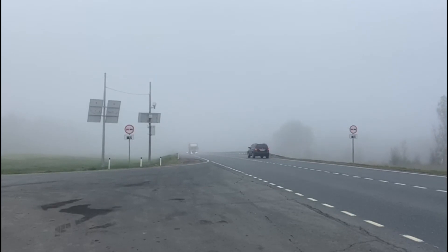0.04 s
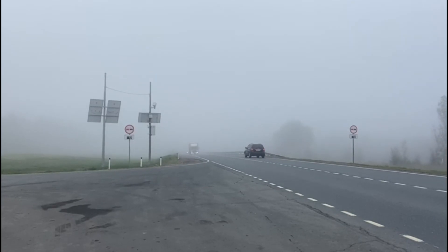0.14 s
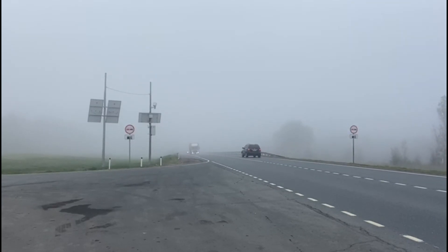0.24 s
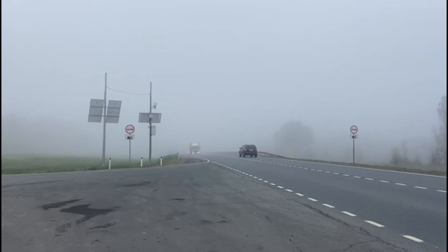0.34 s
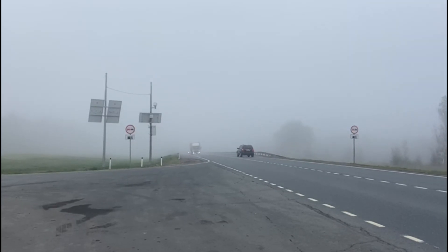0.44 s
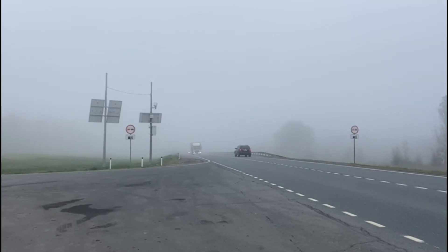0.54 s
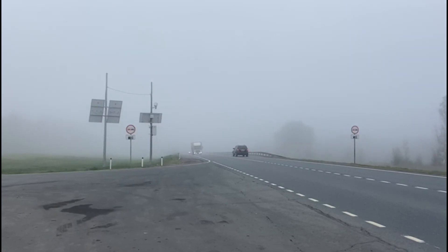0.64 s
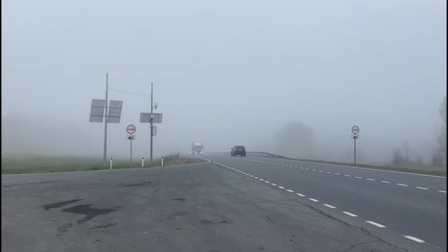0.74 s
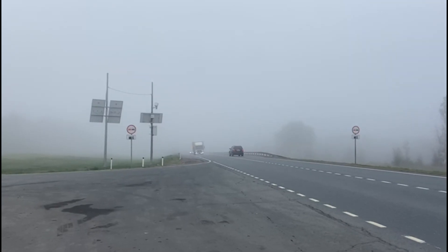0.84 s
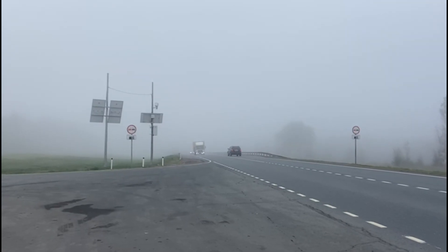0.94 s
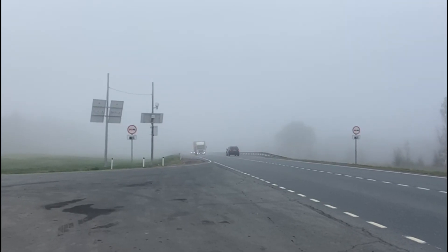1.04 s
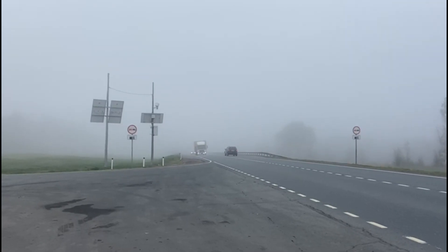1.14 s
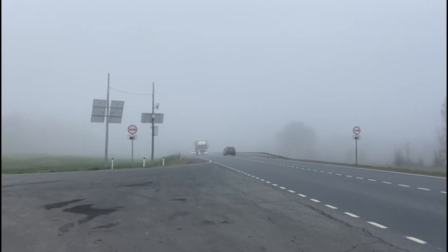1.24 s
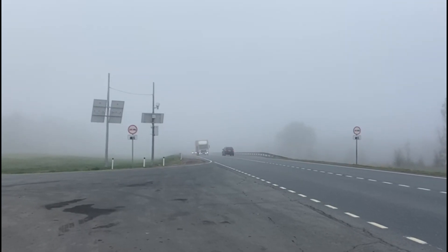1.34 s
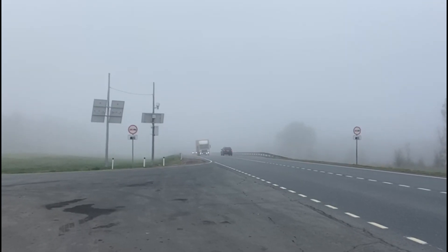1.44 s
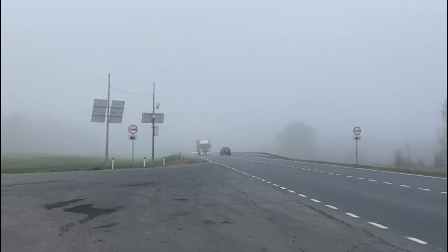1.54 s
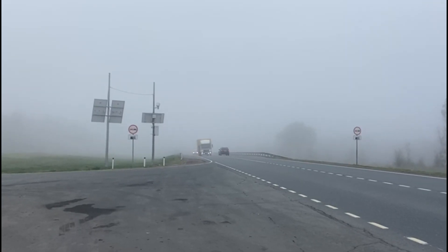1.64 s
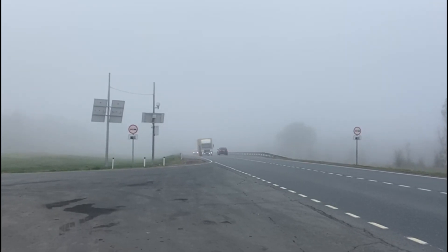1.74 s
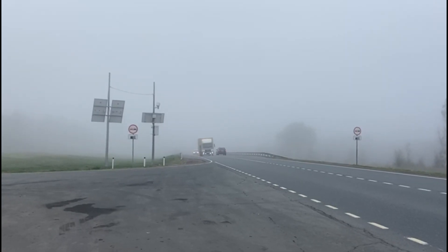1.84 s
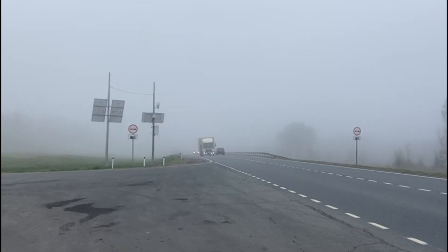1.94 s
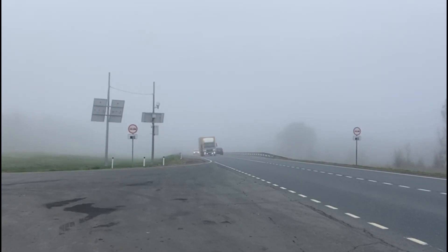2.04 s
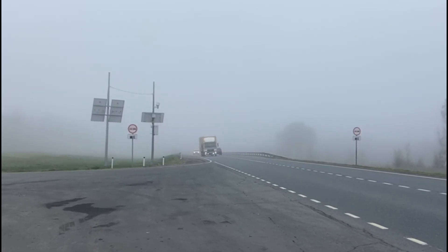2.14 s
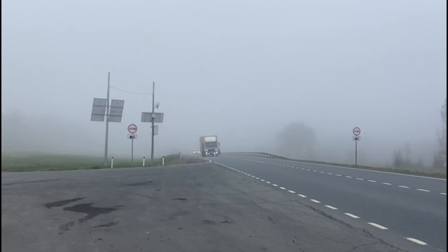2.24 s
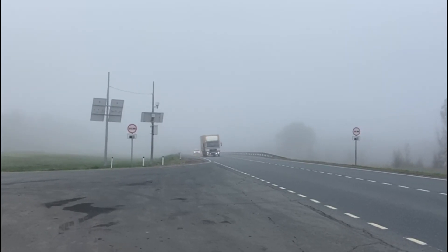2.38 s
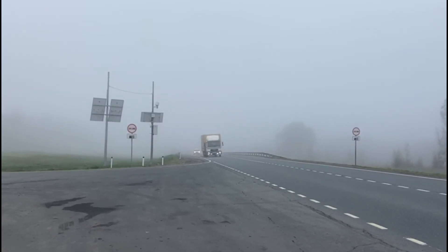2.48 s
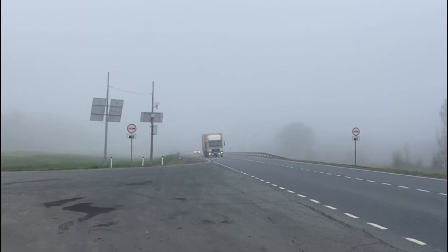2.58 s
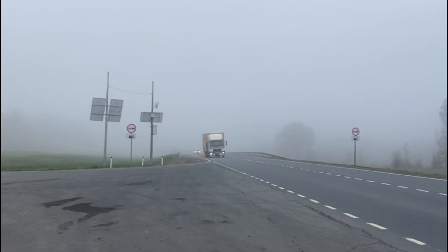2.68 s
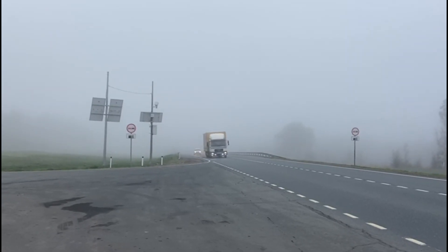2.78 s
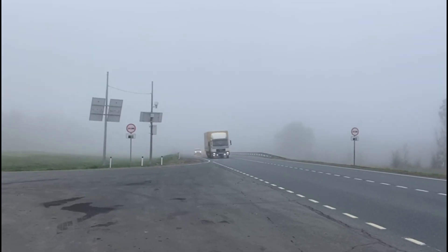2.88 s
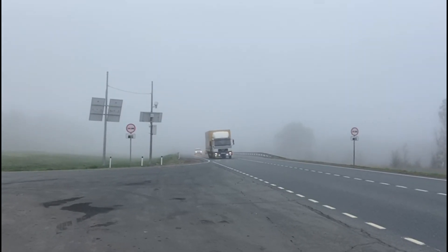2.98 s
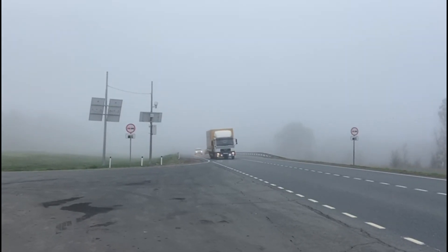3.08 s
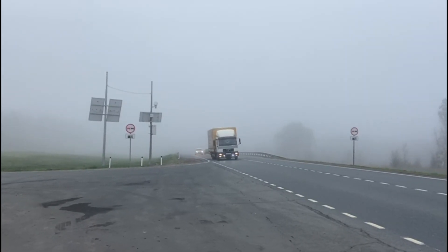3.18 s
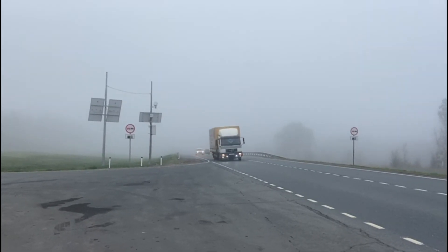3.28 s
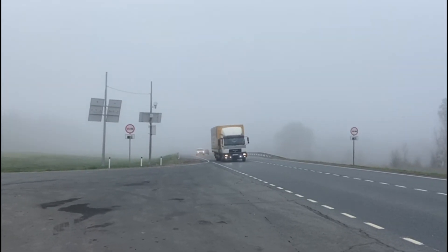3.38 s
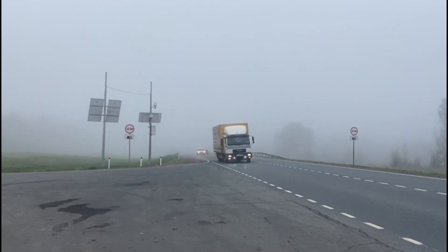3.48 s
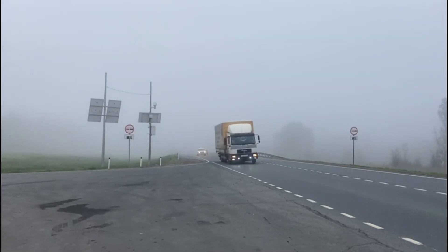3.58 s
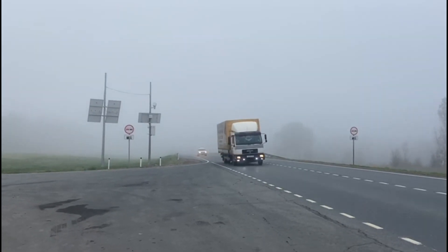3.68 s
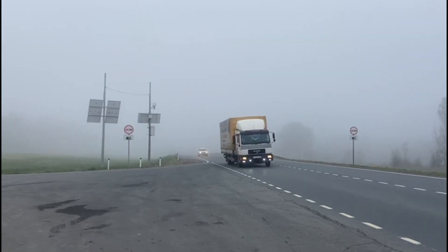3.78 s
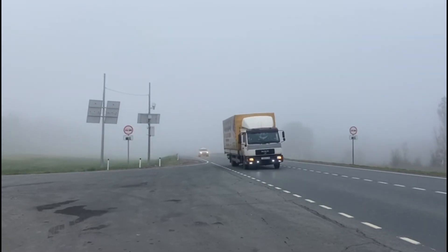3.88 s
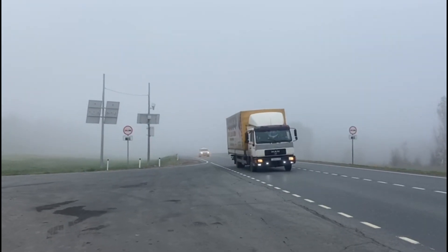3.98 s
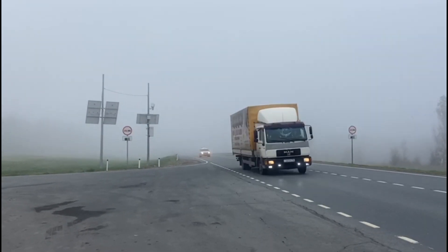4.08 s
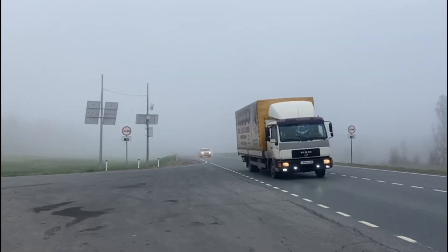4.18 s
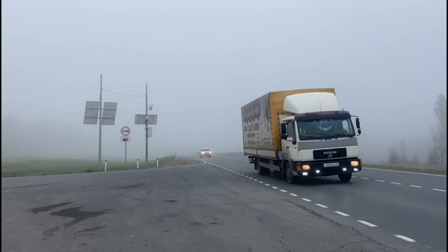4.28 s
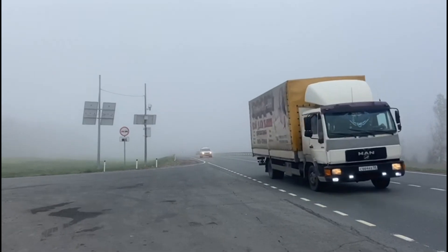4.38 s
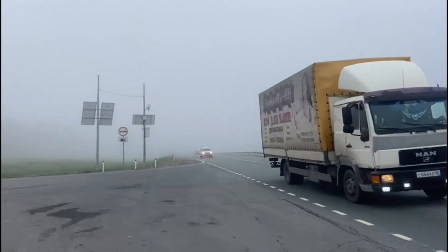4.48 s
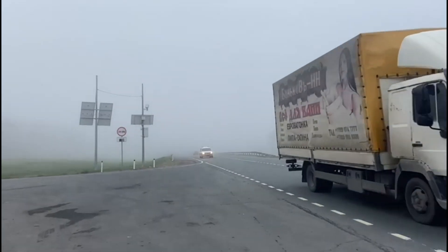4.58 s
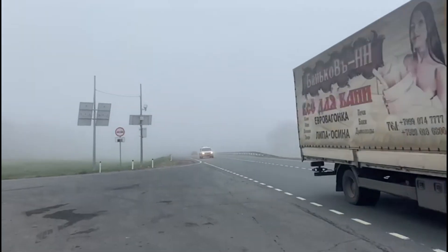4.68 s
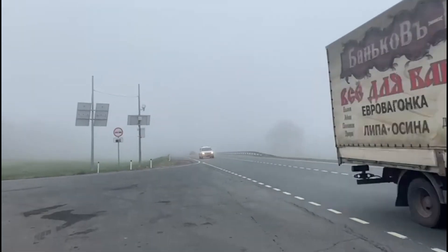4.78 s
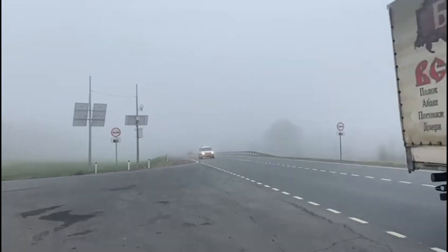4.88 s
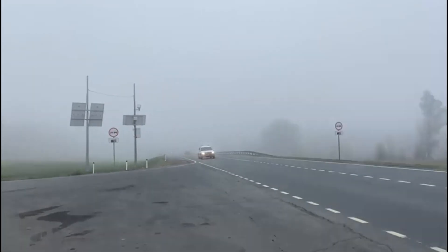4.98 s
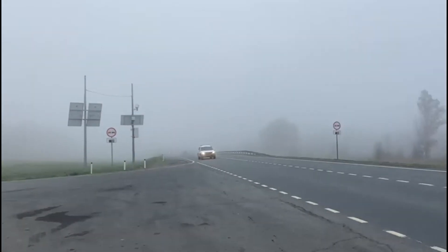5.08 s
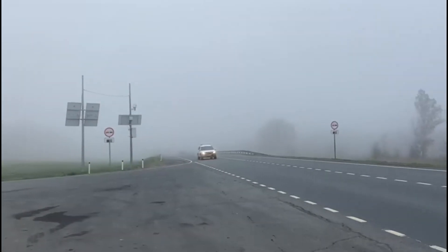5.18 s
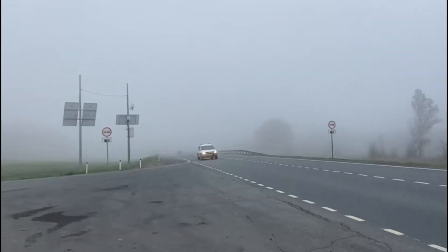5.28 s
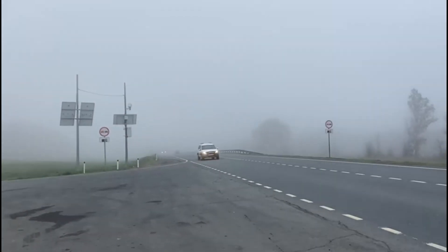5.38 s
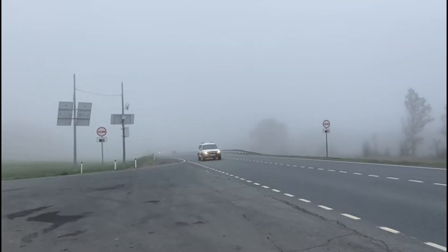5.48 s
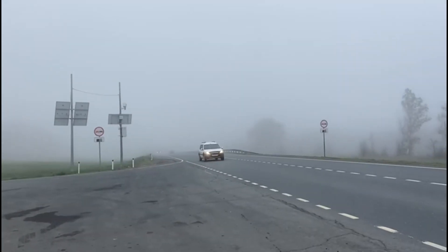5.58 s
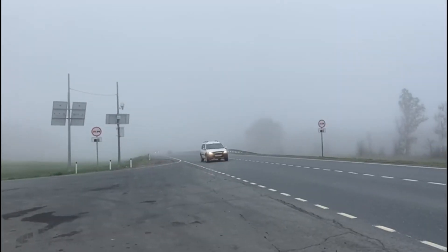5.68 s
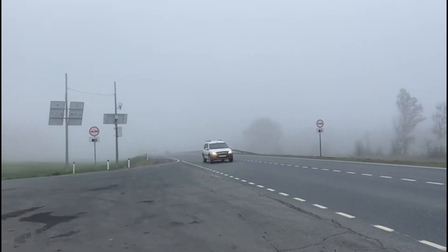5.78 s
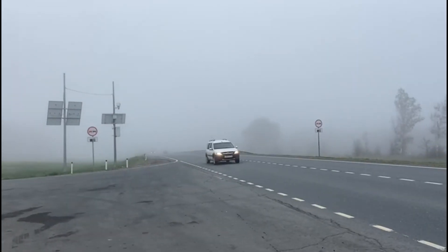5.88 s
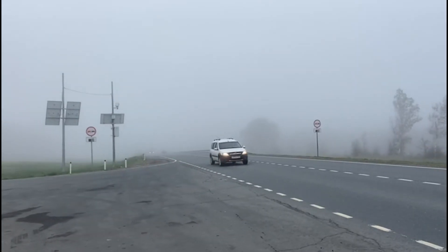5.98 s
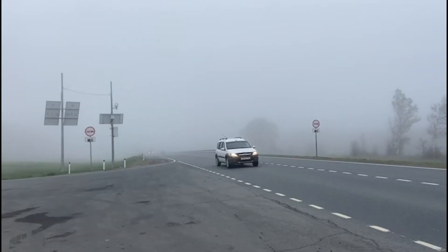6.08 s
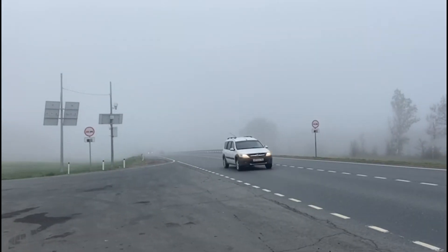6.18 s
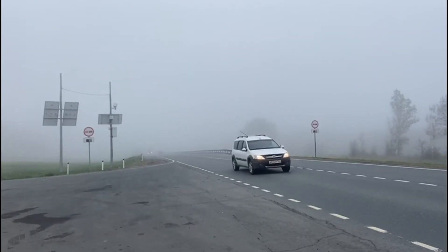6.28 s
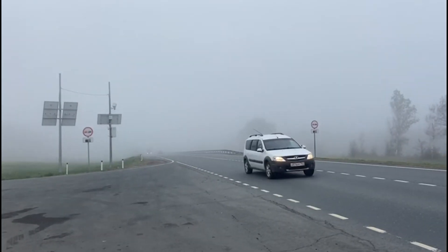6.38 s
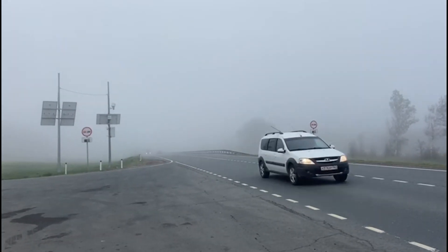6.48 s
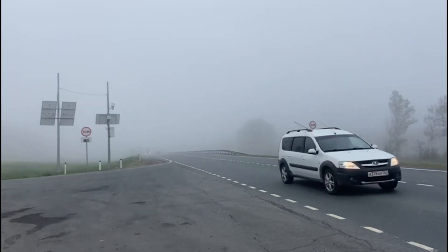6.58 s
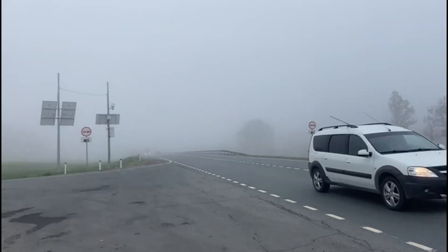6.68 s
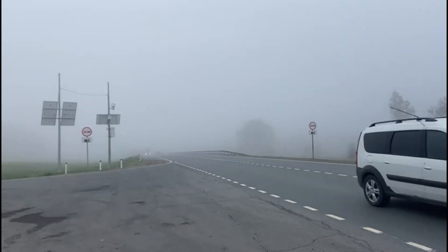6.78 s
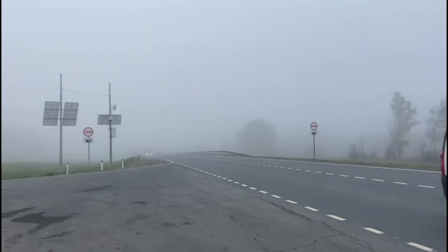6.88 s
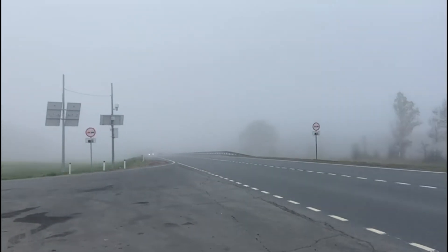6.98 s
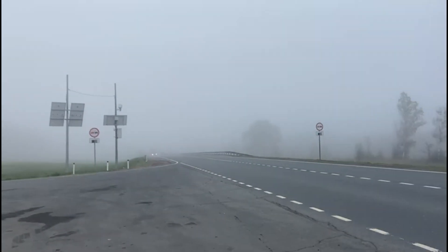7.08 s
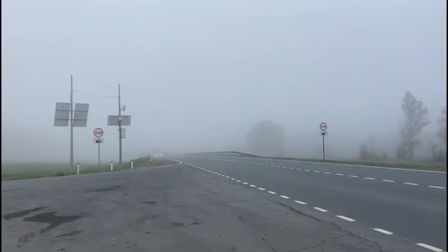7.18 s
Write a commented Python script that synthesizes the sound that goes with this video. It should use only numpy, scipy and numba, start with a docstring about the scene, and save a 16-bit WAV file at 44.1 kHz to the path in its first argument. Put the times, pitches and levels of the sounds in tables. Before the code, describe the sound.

A phone stands on the open verge of a highway. In the first half second, low wind gusts and three soft, deep thumps jolt it, over dull tyre noise far ahead and the fading roar of an earlier vehicle behind. From about 1 second a truck's deep boom arrives, pulsing with the wheels; by 2 seconds tyre roar and a diesel engine note join and steadily grow. Around 4.5 to 5 seconds the truck storms past closely: broad roar, bright tyre hiss from the front and then rear axles, slipstream buffeting. Its exhaust pitch slides down and it recedes as an almost pure, wavering low drone, the treble falling away quickly. From about 5.7 seconds a car's lighter tyre roar emerges, swelling to a swishing pass near 6.9 seconds, with no distinct engine, then a short wake as it begins to recede by 7.2 seconds.

```python
"""Truck and car pass a phone by the road

A box truck and then an estate car come from ahead, pass a phone on the verge of a highway and drive away behind.
Tyre roar and hiss are shaped noise; the truck's boom pulses once a wheel turn. Its exhaust is a stack of
sine waves whose pitch drops as it goes by. Gusts of low noise buffet the phone and short swings jolt it.
A far vehicle reaches the two ports out of step, with gliding notches; a near one is a broad wall of noise."""
import sys
import numpy as np
from scipy import signal
from scipy.fft import rfft, irfft, next_fast_len
from scipy.io import wavfile
from scipy.ndimage import map_coordinates
from numba import njit

SR = 44100
rng = np.random.default_rng(int(sys.argv[2]) if len(sys.argv) > 2 else 0)


def unload_audio(sound):
    """Save the sound as a 16-bit wav file, at the path given as the first command line argument."""
    columns = np.transpose(np.atleast_2d(sound))
    # keep every value between -1 and 1, then stretch to whole-number steps
    steps = np.round(np.clip(columns, -1, 1) * 32767)
    wavfile.write(sys.argv[1], SR, steps.astype(np.int16))


N = 318843
T = np.arange(N) / SR  # time of every sample, s


def undb(db):
    """Turn decibels into a gain."""
    return 10 ** (np.asarray(db) / 20)


def unit(x):
    """Scale to an rms of 1."""
    return x / np.sqrt(np.mean(x ** 2))


def noise(spectrum, channels=5):
    """Unrelated noises, together of rms 1, following a spectrum table and falling steeply beyond its ends."""
    size = next_fast_len(N)
    hz, db = np.transpose(spectrum)
    log_hz = np.log(np.maximum(np.fft.rfftfreq(size, 1 / SR), 1))
    beyond = log_hz - np.clip(log_hz, np.log(hz[0]), np.log(hz[-1]))
    gain = undb(np.interp(log_hz, np.log(hz), db))
    gain = gain * np.exp(-4 * np.abs(beyond))  # about 24 dB per octave
    white = rng.standard_normal((channels, size))
    return unit(irfft(rfft(white) * gain, size)[:, :N])


def walk(rate):
    """A smooth random wander of spread near 1, with a new target rate times a second."""
    knots = rng.standard_normal(1024)
    return map_coordinates(knots, [T * rate], order=3, mode="wrap")


def rise(centre_s, length_s):
    """A smooth step from 0 to 1."""
    return (1 + np.tanh((T - centre_s) / length_s)) / 2


def swell(centre_s, length_s):
    """A bell-shaped swell from 0 to 1 and back."""
    return np.exp(-((T - centre_s) / length_s) ** 2)


# How each vehicle drives by: abreast_s, speed_m_per_s, distance_m,
# glide_sine (sine of the angle to the road at which its notches glide)
TRUCK_PATH = (4.78, 30, 6.5, .26)
CAR_PATH = (6.89, 25.7, 4, .5)


def position(path):
    """Range in m on a straight road, and bearing: -1 far ahead, 0 abreast, 1 far behind."""
    abreast_s, speed, distance, _ = path
    along = speed * (T - abreast_s)
    metres = np.hypot(along, distance)
    return metres, along / metres


def passing(path, db, loudest_s, breadth_m, ahead_db, behind_db):
    """A passing source fades with range, at one rate to the front and another to the rear."""
    along = path[1] * (T - loudest_s)
    loss_db = np.where(along < 0, ahead_db, behind_db)
    return undb(db - loss_db * np.log10(np.hypot(1, along / breadth_m)))


# The truck comes over a crest: boom first, then slipstream, tyres and a slow-rising exhaust;
# for each part: centre_s, rise_length_s
CREST = {"boom": (0.95, .14), "exhaust": (1.9, .8), "slipstream": (1.4, .25), "tyres": (1.75, .25)}


def over_crest(part):
    """A part of the truck's sound grows as it clears the crest."""
    return np.sqrt(rise(*CREST[part]))


@njit
def band(x, hz, width):
    """A resonant band-pass filter with a moving centre, gain 1 there."""
    y, b, l = np.empty(len(x)), 0., 0.  # b and l hold the filter's band and low states
    for i in range(len(x)):
        g, k = np.tan(np.pi * hz[i] / SR), width / hz[i]
        v = (b + g * (x[i] - l)) / (1 + g * (g + k))
        b, l, y[i] = 2 * v - b, l + 2 * g * v, k * v
    return y


# Where the far port runs half a cycle behind the near one: far_away_hz, close_by_hz, width_hz
TRUCK_TURNS = [(1540, 1830, 280), (2620, 2920, 150), (3170, 3830, 240), (4170, 4700, 160),
               (4800, 5450, 260), (5450, 6200, 150)]
CAR_TURNS = [(1740, 1830, 340), (2680, 3330, 300), (3480, 4400, 130), (4250, 5000, 110), (4950, 5900, 130)]


def turned(x, turns, nearness):
    """At the far port sound is equally loud, but a whole cycle later past each turn."""
    for far_hz, near_hz, width in turns:
        x = x - 2 * band(x, far_hz + (near_hz - far_hz) * nearness, float(width))
    return x


# Notches cut by the reflection off the road: far_away_hz, close_by_hz, width_hz, depth_db
TRUCK_NOTCHES = [(2150, 2400, 160, -3), (3170, 3830, 200, -9), (4170, 4700, 220, -14),
                 (4730, 5600, 400, -6)]
CAR_NOTCHES = [(1740, 1830, 200, -5), (2680, 3330, 300, -6), (4250, 5000, 330, -12), (5100, 5900, 400, -5),
               (6250, 7200, 450, -9)]


def notched(x, notches, nearness):
    """The road's reflection weakens narrow bands that glide up as the vehicle nears."""
    for far_hz, near_hz, width, db in notches:
        x = x - (1 - undb(db)) * band(x, far_hz + (near_hz - far_hz) * nearness, float(width))
    return x


# How far the left port lags for sound from behind: frequency_hz, just_behind_radians, far_behind_radians
REAR_LAG = [(0, 0, 0), (200, .3, .4), (400, 1.4, 2.2), (560, 1.9, 2.9), (750, 2.1, 3.14), (1200, 2.5, 3.2),
            (1550, 3.9, 3.5), (2100, 4.7, 4.8), (2600, 4.7, 4.5), (3000, 5.6, 3.1), (3600, 4.1, 4),
            (4500, 6, 6.3), (5500, 7.4, 7.9), (6600, 7.4, 8.6), (7500, 6.3, 6.3)]


def lagged(x, farness):
    """Sound from behind bends round the phone, shifting the left port's phase by an amount set by range."""
    hz, s, frames = signal.stft(x, SR, nperseg=1024)
    points, near, far = np.transpose(REAR_LAG)
    near = np.interp(hz, points, near)[:, None]
    far = np.interp(hz, points, far)[:, None]
    lag = near + (far - near) * np.interp(s, T, farness)
    return signal.istft(frames * np.exp(-1j * lag), SR)[1][:N]


# Band in which a broad source differs between the ports: low_hz, high_hz
BROAD_SIDE_HZ = (1300, 4500)


def ports(x, path, scatter_db, turns=(), notches=(), broad_side_db=-6.5, scatter_top_hz=2200):
    """Noises to two ports: a point source ahead or behind, a broad one abreast, and dull verge scatter."""
    broad_span, rear_span = 1.05, 2.7  # reach of the broad and the near-behind sound, in passing distances
    metres, bearing = position(path)
    _, _, distance, glide_sine = path
    nearness = np.tanh(distance / metres / glide_sine)
    farness = 1 - np.exp(-(metres / distance / rear_span) ** 4)
    ahead = notched(x[0], notches, nearness)
    behind = lagged(x[0], farness)
    point = np.where(bearing < 0, [ahead, turned(ahead, turns, nearness)], [behind, x[0]])
    focus = 1 - 1 / (1 + (bearing * metres / distance / broad_span) ** 6)  # 0 abreast, 1 far off
    side = signal.sosfilt(signal.butter(2, BROAD_SIDE_HZ, "bandpass", fs=SR, output="sos"), x[4])
    broad = x[1] + undb(broad_side_db) * np.array([side, -side])
    dull = signal.butter(4, scatter_top_hz, fs=SR, output="sos")
    scatter = undb(scatter_db) * signal.sosfilt(dull, x[2:4])
    return np.sqrt(focus) * point + np.sqrt(1 - focus) * broad + scatter


def alike(x, apart_db):
    """Mix one noise shared by both ports with a separate noise for each."""
    return (x[0] + undb(apart_db) * x[2:4]) / np.hypot(1, undb(apart_db))


def lean(x, right_db):
    """Make the right channel louder than the left."""
    return x * undb(np.array([[-right_db], [right_db]]) / 2)


# Tone of far tyre roar and of any tyre hiss: frequency_hz, level_db (relative, per Hz)
FAR_TREAD = [(250, -16), (560, -6), (790, -13), (960, -5), (1120, 1), (1400, -3.5), (1700, -6.5),
             (1950, -8.5), (2300, -15), (2900, -13), (4000, -26)]
HISS = [(1800, -15.5), (3100, 5.5), (3700, 3.5), (4300, 4), (4800, -1), (5400, -3), (6100, -3.5),
        (7000, -8), (8000, -19.5), (11000, -64)]


def far_traffic(tread_db=-44, hiss_db=-57, flutter_db=1.4):
    """Dull tyre noise far up the road, until the truck comes over the crest and covers it."""
    roar = noise(FAR_TREAD) * undb(tread_db + flutter_db * walk(14))
    tyres = roar + noise(HISS) * undb(hiss_db)
    heard = ports(tyres, TRUCK_PATH, scatter_db=-6, turns=TRUCK_TURNS, notches=TRUCK_NOTCHES, scatter_top_hz=6000)
    return heard * np.sqrt(1 - rise(*CREST["tyres"]))


# Tone of the roar behind a vehicle: frequency_hz, level_db (relative, per Hz)
REAR_ROAR = [(330, -4), (420, -3), (540, -4.5), (650, -1.5), (780, 0), (950, -2), (1300, -8.5),
             (1750, -8.5), (2100, -12.5), (2550, -14), (3200, -26), (4200, -24.5), (5300, -22), (6500, -38)]


def traffic_behind(db=-39.7, fade_db_per_s=.7, flutter_db=1.0, top_hz=2000):
    """A vehicle that went by earlier roars away behind the phone: dulled noise that slowly fades."""
    dull = signal.butter(2, top_hz, fs=SR, output="sos")
    roar = signal.sosfilt(dull, noise(REAR_ROAR, channels=1)[0])
    roar = roar * undb(db - fade_db_per_s * T + flutter_db * walk(10))
    return np.array([lagged(roar, np.ones(N)), roar])


# Tone of deep wind and of the flutter in a gust: frequency_hz, level_db (relative, per Hz)
WIND = [(15, -22), (28, -22), (42, -6.5), (60, -2.5), (85, -5.5), (130, -14.5), (250, -24), (500, -49)]
FLUTTER = [(75, -5), (110, 0), (150, -7), (220, -7), (320, -14), (450, -26)]
# Gusts on the phone: centre_s, half_length_s, deep_buffeting_db, flutter_db
GUSTS = [(0.02, .08, -23.5, -24), (.15, .05, -32, -26), (.28, .07, -29, -24), (.44, .11, -33.5, -26.5),
         (1.45, .05, -37, -24), (5.04, .05, -22, -30), (5.4, .06, -30, -25), (7.2, .1, -35, -34)]


def wind(buffet_db=1.5):
    """Gusts and the truck's slipstream shake the phone with low noise, nearly alike at both ports."""
    slipstream = passing(TRUCK_PATH, *TRUCK_PASS["slipstream"]) * over_crest("slipstream")
    deep = sum(undb(db) * swell(s, length) for s, length, db, _ in GUSTS)
    flutter = sum(undb(db) * swell(s, length) for s, length, _, db in GUSTS)
    air = noise(WIND) * np.hypot(slipstream, deep) + noise(FLUTTER) * flutter
    return alike(air, apart_db=-13.5) * undb(buffet_db * walk(14))


# Low thumps on the phone: start_s, pitch_hz, level_db, decay_s
THUMPS = [(0.127, 53.4, -11, 0.011), (0.284, 74, -16, .014), (0.387, 150, -17, .014)]


def thumps():
    """Each jolt of the phone is a quickly damped swing."""
    out = 0
    for start, hz, db, decay in THUMPS:
        age = np.maximum(T - start, 0)
        out = out + undb(db) * np.sin(2 * np.pi * hz * age) * np.exp(-age / decay)
    return out


# Tone of the very top of tyre hiss: frequency_hz, level_db (relative, per Hz)
SIZZLE = [(4000, -14), (5500, -4), (7400, 0), (10600, -4), (12000, -10)]


def sizzle(path, db, loss_db_per_m):
    """The top of the tyre hiss dies away with range."""
    metres, _ = position(path)
    return noise(SIZZLE) * undb(db - loss_db_per_m * metres)


# The diesel as heard: time_s, firing_rate_hz
FIRING = [(0, 92), (1.5, 91), (2.6, 89.6), (3.6, 88.3), (4.55, 88), (4.8, 86.4), (4.95, 82.5), (5.1, 78.8),
          (5.3, 77.4), (6.6, 77.4), (7.23, 76)]


def firing_cycle():
    """Count the engine's firings by adding up the firing rate."""
    return np.cumsum(np.interp(T, *np.transpose(FIRING))) / SR


# Tone of the truck's boom, body and tyre roar: frequency_hz, level_db (relative, per Hz)
BOOM = [(55, -10.5), (80, -7.5), (108, 2.5), (135, -1.5), (165, -11.5)]
TRUCK_BODY = [(130, -6), (178, -1.5), (212, 0.5), (250, -2.5), (298, 0), (345, -6.5), (400, -13),
              (520, -18), (800, -21)]
TRUCK_TREAD = [(250, -21), (480, -14.5), (800, -7.2), (1000, -3.5), (1170, -.7), (1400, -3.8), (1650, -7.5),
               (1950, -5.8), (2250, -10.5), (2900, -14.5), (4000, -27)]
# The front and rear tyres hiss past in turn: centre_s, half_length_s, extra_db
AXLES = [(4.68, .1, 1), (4.93, .08, 3.2)]
# How each truck sound swells and fades: peak_db, loudest_s, peak_breadth_m,
# ahead_loss_db and behind_loss_db (per tenfold range)
TRUCK_PASS = {"boom": (-25.3, 4.8, 6, 4.6, 16), "body": (-18.2, 4.79, 10, 13.8, 29),
              "tread": (-17, 4.6, 17, 24.6, 72), "hiss": (-29.6, 4.79, 16, 28.7, 84),
              "exhaust": (-14.1, 4.95, 4, 12.5, 11.2), "rear": (-21.4, 5.12, 8, 70, 35),
              "slipstream": (-22.8, 4.95, 6, 12, 24)}


def truck(cycle, thump=0.16, tread_thump=0.04, clatter=0.11, flutter_db=.8, heave_db=1.5):
    """Boom heaves with each wheel turn, diesel knock pulses the treble, moving air flutters the roar."""
    firings_per_wheel_turn = 12.4
    gain = {part: passing(TRUCK_PATH, *law) for part, law in TRUCK_PASS.items()}
    wheel = np.cos(2 * np.pi * cycle / firings_per_wheel_turn)
    knock = 1 + clatter * np.cos(2 * np.pi * cycle)
    axles_db = sum(db * swell(s, length) for s, length, db in AXLES)
    boom = noise(BOOM) * (1 + thump * wheel) * gain["boom"]
    boom = boom * over_crest("boom") * undb(heave_db * walk(9))
    rumble = noise(TRUCK_BODY) * gain["body"]
    roar = noise(TRUCK_TREAD) * (1 + tread_thump * wheel) * gain["tread"]
    roar = roar * undb(axles_db + flutter_db * walk(22))
    treble = noise(HISS) + sizzle(TRUCK_PATH, db=-5.5, loss_db_per_m=.15)
    treble = treble * knock * gain["hiss"] * undb(axles_db + flutter_db * walk(30))
    low = lean(ports(boom + rumble, TRUCK_PATH, scatter_db=-14), right_db=1.7)
    tyres = ports(roar + treble, TRUCK_PATH, scatter_db=-12, turns=TRUCK_TURNS, notches=TRUCK_NOTCHES)
    behind = lean(ports(noise(REAR_ROAR) * gain["rear"], TRUCK_PATH, scatter_db=-23), right_db=3)
    churned = alike(wake(5.056, 0.15, db=-20.5), apart_db=4)
    return low + tyres * over_crest("tyres") + behind + churned


# The exhaust's tones: multiple_of_firing_rate, front_level_db, rear_level_db
EXHAUST = [(1, 0, 0), (4 / 3, -2.5, -27.5), (2, -5, -19), (8 / 3, -15, -23), (2.8, -17, -18),
           (10 / 3, -11.5, -21.5)]
# The receding drone wavers: centre_s, half_length_s, change_db
DRONE_SWELLS = [(5.52, .08, 1.5), (5.76, .12, -3), (6.16, .1, 2.5), (6.38, .08, -2.5), (6.62, .09, 2.5),
                (6.82, .07, -4), (7.11, .1, 8)]


def exhaust(cycle, rough_db=1.68, wobble=0.13, waver_db=.4):
    """Firing note and wavering engine tones; from behind the tailpipe leaves an almost pure drone."""
    waver = waver_db * walk(8) + sum(db * swell(s, length) for s, length, db in DRONE_SWELLS)
    gain = passing(TRUCK_PATH, *TRUCK_PASS["exhaust"]) * over_crest("exhaust") * undb(waver)
    rear = (1 + position(TRUCK_PATH)[1]) / 2  # 0 far ahead, 1 far behind
    out = 0
    for multiple, front_db, rear_db in EXHAUST:
        db = front_db + rear * (rear_db - front_db) + rough_db * (multiple - .5) * walk(12)
        phase = 2 * np.pi * multiple * cycle + wobble * multiple ** 2 * walk(9)
        out = out + undb(db) * np.sin(phase)
    return np.sqrt(2) * out * gain


# Tone of the air behind a vehicle: frequency_hz, level_db (relative, per Hz)
WAKE = [(220, -9), (340, -2), (420, 2.5), (560, -16), (760, -2.5), (1000, -23)]


def wake(centre_s, length_s, db):
    """Churned air and the rear tyres make a burst of noise just after a vehicle has gone by."""
    return noise(WAKE) * undb(db) * swell(centre_s, length_s)


# Tone of the car's body and tyre roar: frequency_hz, level_db (relative, per Hz)
CAR_BODY = [(60, -6), (130, 0.5), (180, -3.5), (235, 1), (285, -2), (350, -8), (520, -20.5), (800, -37)]
CAR_TREAD = [(250, -17), (520, -17.5), (750, -10.5), (950, -4), (1150, 0), (1450, -4), (1850, -9.5),
             (2400, -10.5), (3000, -18), (4000, -29)]
# How each car sound swells and fades: peak_db, loudest_s, peak_breadth_m,
# ahead_loss_db and behind_loss_db (per tenfold range)
CAR_PASS = {"body": (-22, 7.0, 5, 15.5, 20), "tread": (-21.4, 6.72, 11, 14, 48),
            "hiss": (-34.2, 6.92, 3, 10, 15), "rear": (-25, 7.03, 5, 34, 21)}


def car(flutter_db=.8):
    """Smaller tyres sing as shaped noise, emerging from behind the truck; no engine is heard."""
    gain = {part: passing(CAR_PATH, *law) for part, law in CAR_PASS.items()}
    rumble = noise(CAR_BODY) * gain["body"]
    roar = noise(CAR_TREAD) * gain["tread"] * undb(flutter_db * walk(22))
    treble = noise(HISS) + sizzle(CAR_PATH, db=-12.5, loss_db_per_m=.12)
    treble = treble * gain["hiss"] * undb(flutter_db * walk(30))
    low = lean(ports(rumble, CAR_PATH, scatter_db=-11), right_db=1.9)
    tyres = ports(roar + treble, CAR_PATH, scatter_db=-18, turns=CAR_TURNS, notches=CAR_NOTCHES)
    behind = ports(noise(REAR_ROAR) * gain["rear"], CAR_PATH, scatter_db=-12)
    churned = alike(wake(7.0, .28, db=-30), apart_db=0.0)
    return np.sqrt(rise(5.72, 0.17)) * (low + tyres + behind + churned)


def scene():
    """Add up far traffic ahead and behind, wind, thumps, truck and car at the two ports."""
    cycle = firing_cycle()
    background = far_traffic() + traffic_behind() + wind() + thumps()
    return background + truck(cycle) + exhaust(cycle) + car()


# The ports oppose each other in one treble band: frequency_hz, left_lag_half_cycles
PORT_PHASE = [(7500, 0), (8400, 1), (9600, 1), (10200, 2)]


def record(dry):
    """The phone favours the right port, opposes the ports in one band, rounds peaks and cuts the top."""
    top_hz = 11800
    fade_in = np.minimum(T / .004, 1)
    left, right = lean(dry, right_db=0.26) * fade_in
    size = next_fast_len(N)
    half_cycles = np.interp(np.fft.rfftfreq(size, 1 / SR), *np.transpose(PORT_PHASE))
    left = irfft(rfft(left, size) * np.exp(-1j * np.pi * half_cycles), size)[:N]
    out = np.array([left, right])
    out = out / (1 + np.abs(out / .95) ** 6) ** (1 / 6)  # bends only the highest peaks
    return signal.sosfilt(signal.ellip(8, .2, 80, top_hz, fs=SR, output="sos"), out)


dry = scene()
out = record(dry)
unload_audio(out)
```